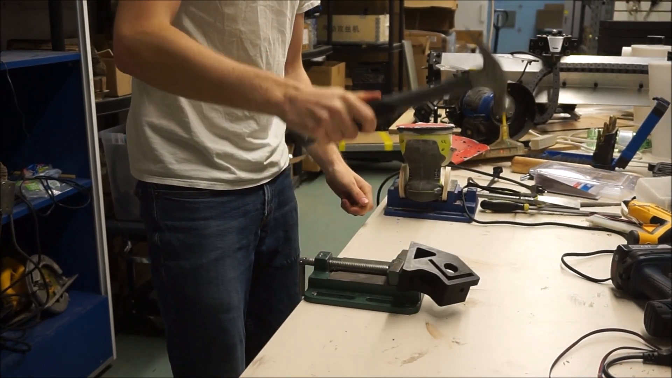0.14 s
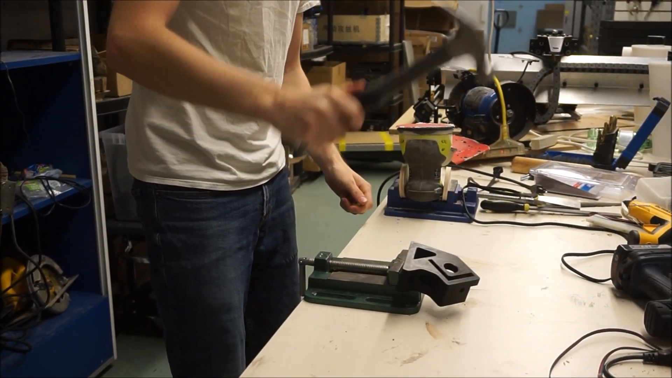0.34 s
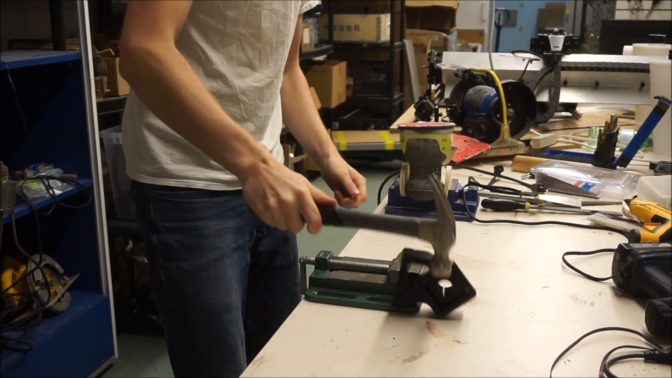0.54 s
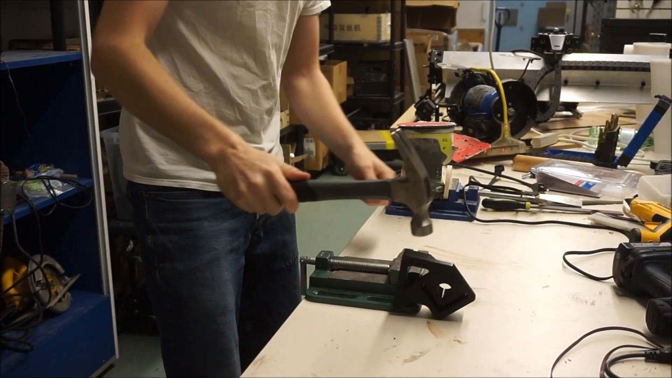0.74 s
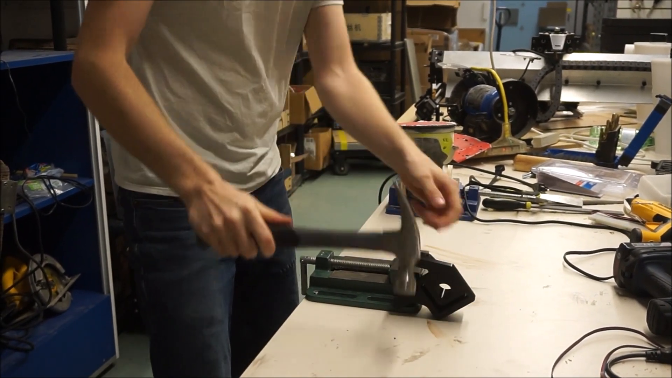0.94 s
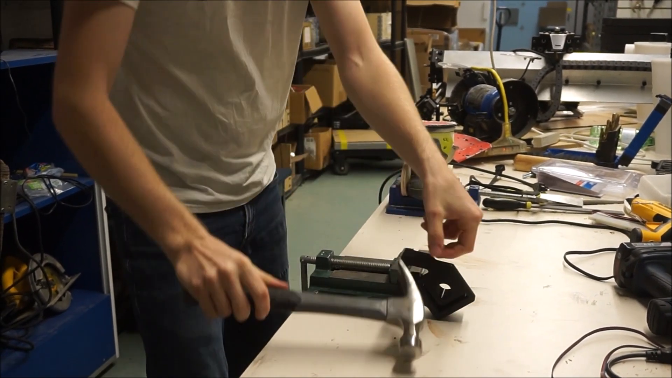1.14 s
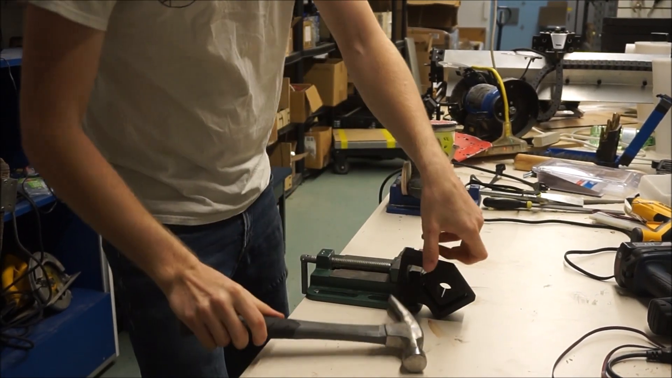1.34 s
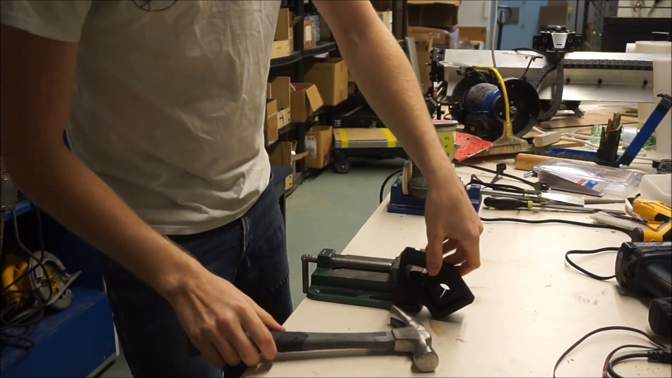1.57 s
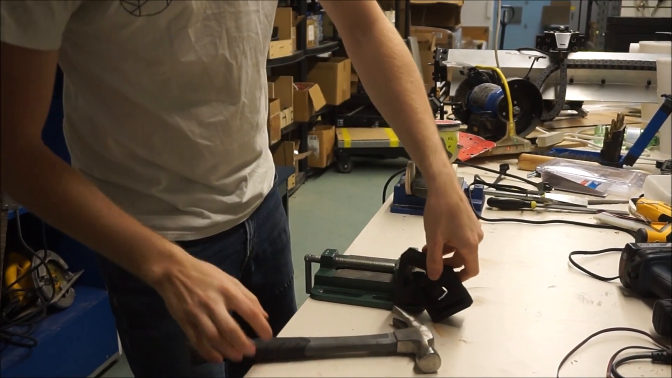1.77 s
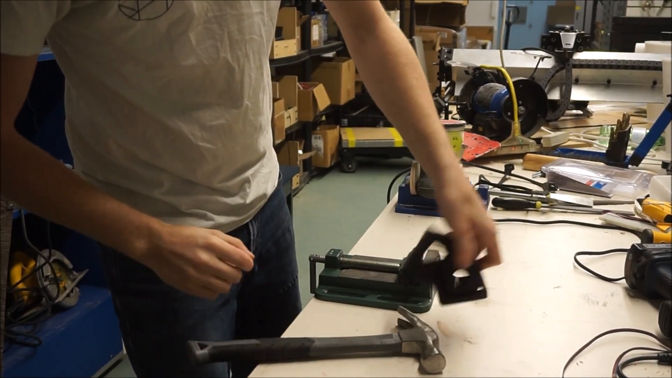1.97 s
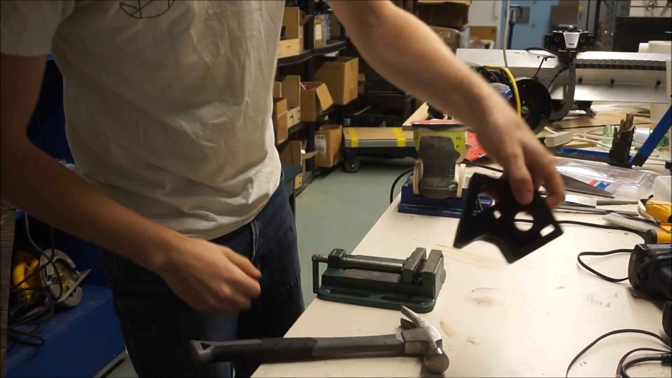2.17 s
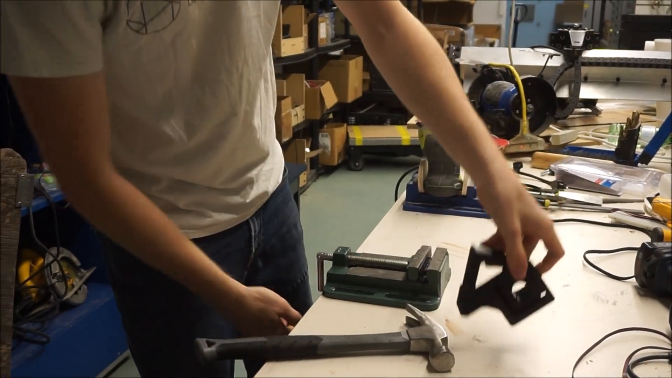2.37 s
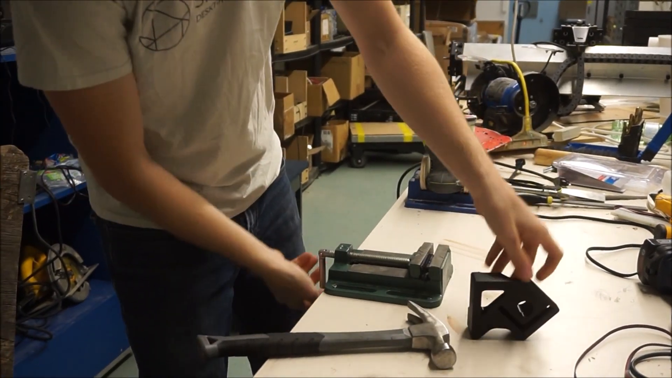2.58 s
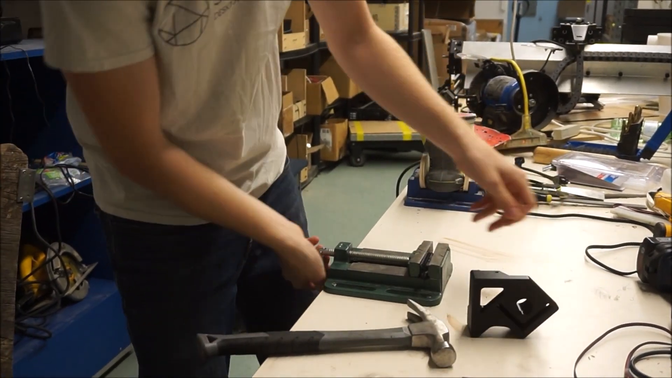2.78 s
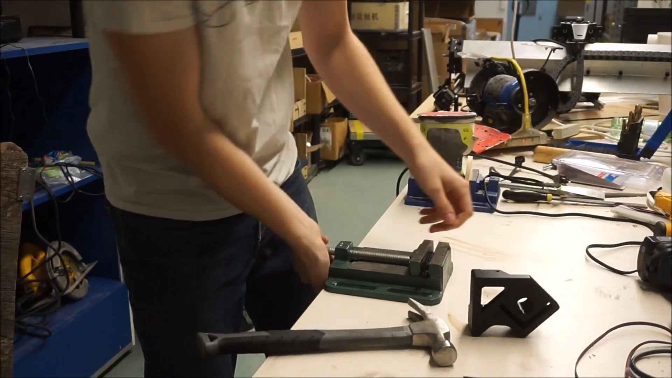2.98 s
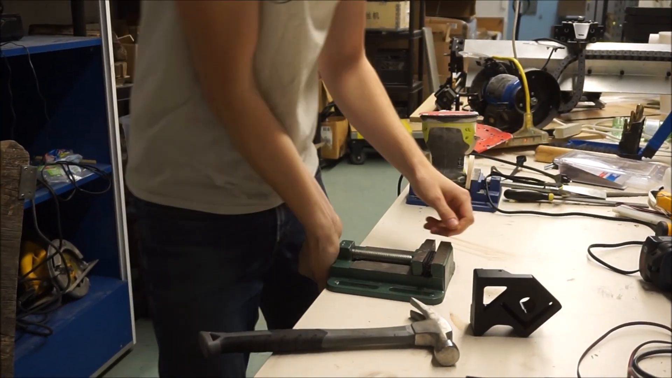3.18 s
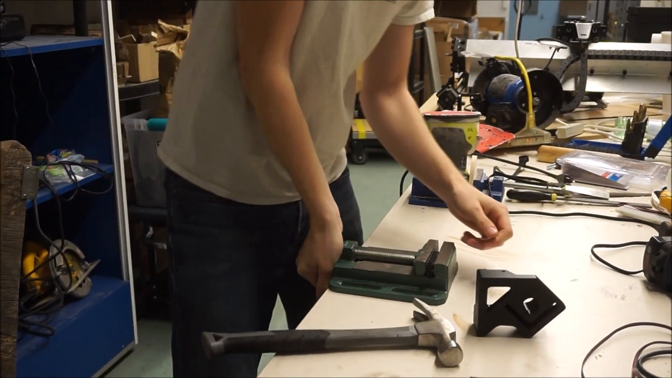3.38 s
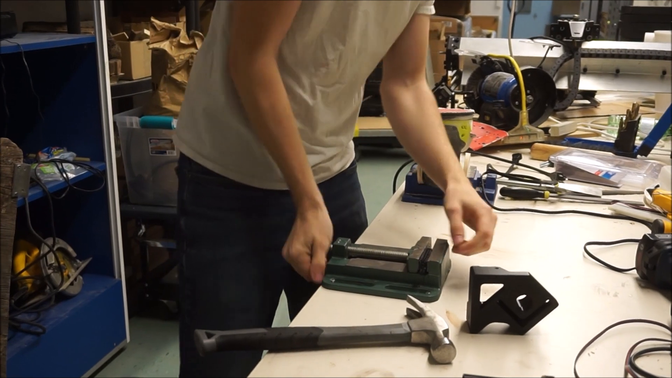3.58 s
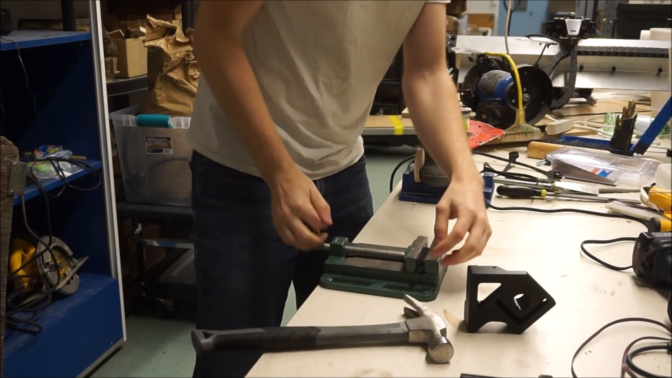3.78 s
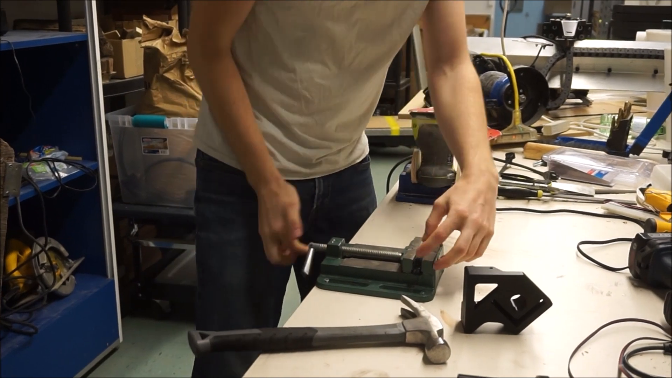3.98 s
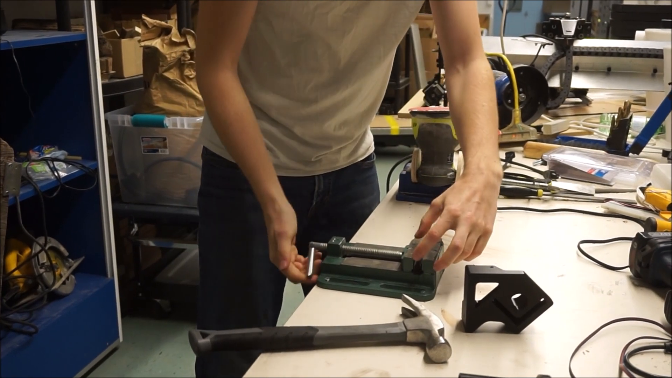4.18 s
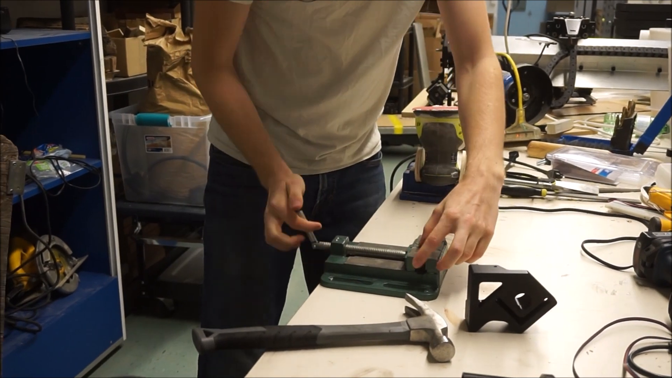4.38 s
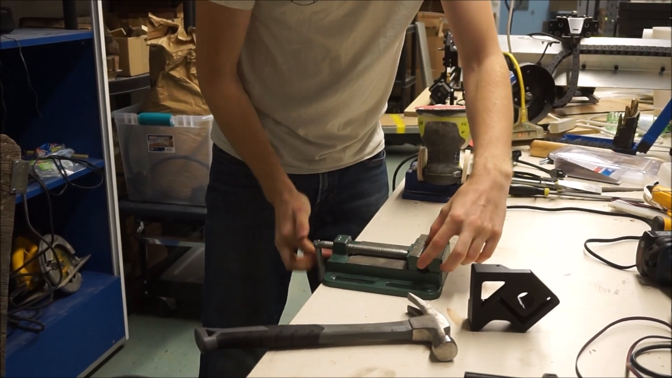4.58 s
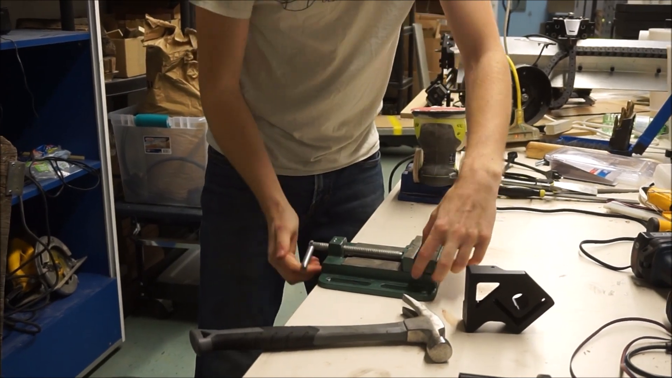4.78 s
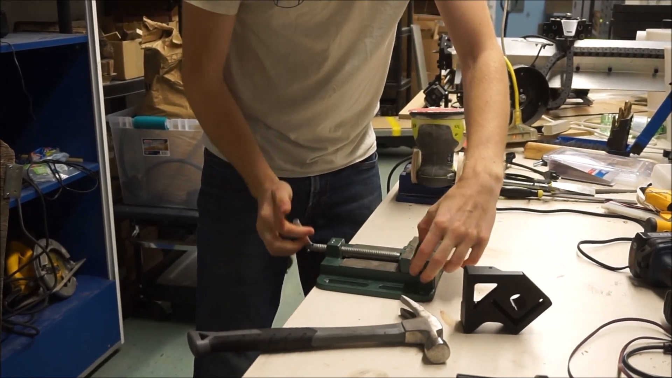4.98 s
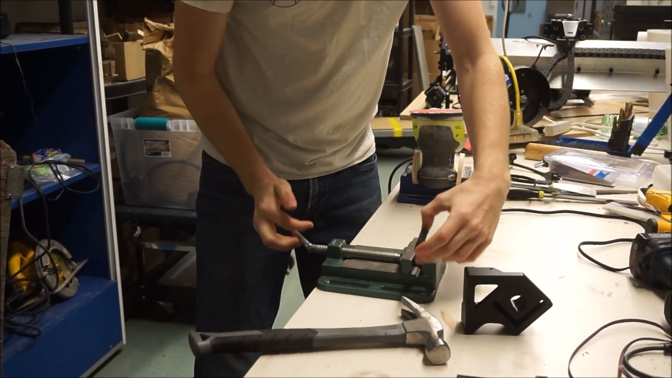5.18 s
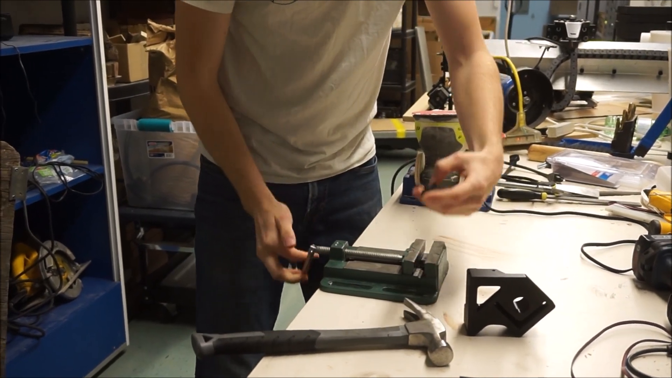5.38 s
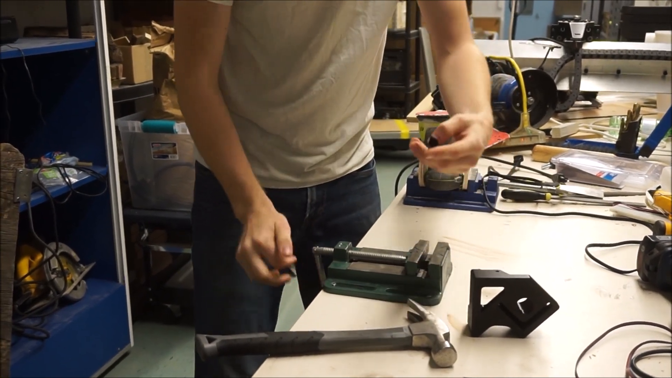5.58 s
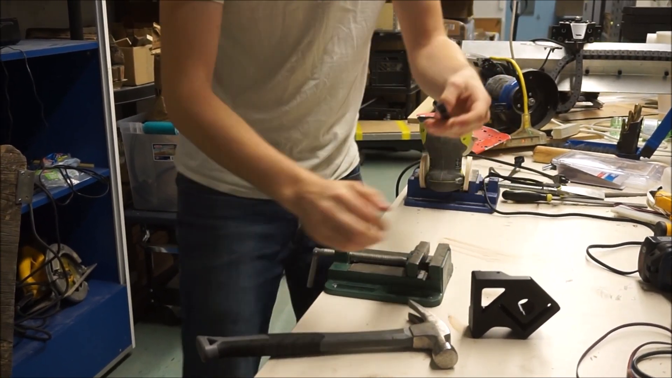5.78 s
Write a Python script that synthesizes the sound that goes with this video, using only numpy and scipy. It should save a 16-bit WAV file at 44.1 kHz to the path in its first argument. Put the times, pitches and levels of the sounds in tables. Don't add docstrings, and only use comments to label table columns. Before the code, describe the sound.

Hammer smacks on plastic ring through a large room, followed by thuds on a wooden bench, metallic vise knocks, handle clinks and a short scrape.

```python
import sys
import numpy as np
from scipy import signal
from scipy.fft import rfft, irfft
from scipy.io import wavfile

SR = 44100
rng = np.random.default_rng(int(sys.argv[2]) if len(sys.argv) > 2 else 0)


def gain_from_decibels(decibels):
    exponent = np.asarray(decibels, float) / 20
    return 10 ** exponent


def wav_record(signal):
    frames = np.transpose(np.atleast_2d(signal))
    bounded = np.clip(frames, -1, 1)
    quanta = np.round(bounded * 32767).astype(np.int16)
    wavfile.write(sys.argv[1], SR, quanta)


N = 257103
LEAD = 4410
LENGTH = N + LEAD

# mode in Hz, level in dB, t60 in seconds.
PLASTIC = [(1020, 5.5, 0.0022), (1170, -14, 0.017), (1862, 11, 0.11), (2690, 2.5, 0.0035),
           (4040, 7.5, 0.059), (4500, 7, 0.027), (5890, 7.5, 0.025)]
# mode in Hz, level in dB, t60 in seconds.
VISE_MODES = [(430, 6, .05), (560, 6, .05), (690, 9, .06), (815, 15, .1), (931, 10, .07), (1092, 13, .08),
              (1170, 13, .08), (1421, 9, .06),
              (1640, 14, .07), (1828, 14, .09), (2010, 9, .07), (2200, 10, .07), (2515, 10, .06),
             (2775, 12, .06), (3055, 12, .08), (3385, 12, .08), (3810, 10, .07), (4150, 7, .02),
             (4560, 9, .07), (5450, 8, .03), (6430, 6, .03), (7450, 9, .05)]
VISE = VISE_MODES


def rms_one(x):
    return x / np.sqrt(np.mean(x ** 2) + 1e-20)


def at_hz(points, hz):
    table_hz, value = np.transpose(points)
    return np.interp(np.log(hz), np.log(table_hz), value)


def band(x, low_hz, high_hz):
    return signal.sosfilt(signal.butter(2, [low_hz, high_hz], "band", fs=SR, output="sos"), x + 1e-18)


def envelope(start_s, peak_db, swell_s, fade_db_per_s):
    since_s = (np.arange(LENGTH) - LEAD) / SR - start_s
    swell = np.clip(1 - since_s / swell_s, 0, 1) ** 3
    fade_db = fade_db_per_s * np.maximum(since_s - swell_s, 0)
    return (since_s > 0) * gain_from_decibels(peak_db - 30 * swell - fade_db)


def ring(x, hz, t60_s):
    radius, angle = gain_from_decibels(-60 / (t60_s * SR)), 2 * np.pi * hz / SR
    return signal.lfilter([0, np.sin(angle)], [1, -2 * radius * np.cos(angle), radius * radius], x + 1e-18)


def struck(points, modes, size):
    hz = np.maximum(np.arange(size + 1) * SR / size / 2, 1)
    peaks = 0
    for centre_hz, db, t60_s in modes:
        detuning = (hz - centre_hz) * t60_s * 2 * np.pi / np.log(1000)
        peaks = peaks + gain_from_decibels(2 * db) / (1 + detuning ** 2)
    cepstrum = irfft(np.log(gain_from_decibels(at_hz(points, hz)) * np.sqrt(1 + peaks)))
    cepstrum[1:size] *= 2
    cepstrum[size + 1:] = 0
    return irfft(np.exp(rfft(cepstrum)))[:size]


def stereo_bands(weight, size):
    # frequency in Hz, likeness -1 to 1.
    likeness = [(30, .4), (70, .65), (130, .995), (300, .985), (600, .8), (2500, .22), (5000, .13),
                (14000, .4)]
    # frequency in Hz, left minus right in dB.
    sidedness = [(60, -3.5), (180, 1.5), (550, -2), (1650, -3.5), (4970, 0), (15000, -0.5)]
    edges_hz = 22 * 2 ** np.arange(0, 9.7, .5)
    out, white = 0, rng.standard_normal((2, 2, size))
    for k, (low_hz, high_hz) in enumerate(zip(edges_hz, edges_hz[1:])):
        mid, side = band(white[k % 2], low_hz, high_hz)
        hz = np.sqrt(low_hz * high_hz)
        alike = np.clip(at_hz(likeness, hz), -1, 1)
        tilt_db = at_hz(sidedness, hz) / 2
        pair = np.sqrt(1 + alike) * mid + np.sqrt(1 - alike) * side * [[1], [-1]]
        out = out + weight(hz) * pair * gain_from_decibels(np.array([[tilt_db], [-tilt_db]]))
    return out


def knocks(events, modes, contact_s, thump_db, bright_db, edge_db, knee_db, middle_db, send_db):
    direct, send, size = np.zeros(LENGTH), np.zeros(LENGTH), 8192
    phase = np.arange(1024) / SR / contact_s
    for s, level_db, dull_db, hard_db in events:
        high_db = middle_db + 0.41 * hard_db
        top_db = hard_db + bright_db
        slope = [(25, dull_db + thump_db), (90, dull_db - 26.0), (200, dull_db - 5.5), (400, dull_db + 5.0),
                 (950, 0.038), (2200, high_db - 8.5), (3400, high_db + knee_db),
                 (5200, top_db + 3.5), (9000, top_db - 0.5), (16000, top_db + edge_db)]
        uneven = rfft(rng.standard_normal(1024) * phase * np.exp(-phase))
        strength = np.abs(uneven)
        rattle = irfft(uneven / (strength + .3 * strength.mean())) * np.exp(-(phase / 7) ** 4)
        excited = []
        for hz, db, t60_s in modes:
            seated_hz = hz * (1 + .012 * rng.normal() * (t60_s < .11))
            excited.append((seated_hz, db + 4.5 * rng.normal(), t60_s))
        sound = struck(slope, excited, size=size)
        close = np.convolve(sound, rattle)[:size]
        sound = gain_from_decibels(level_db) * sound / np.abs(band(sound, 600, 1500)).max()
        close = gain_from_decibels(level_db) * close / np.abs(band(close, 600, 1500)).max()
        at = round(s * SR) + LEAD
        stop = min(size, LENGTH - at)
        direct[at:at + stop] += close[:stop]
        send[at:at + stop] += gain_from_decibels(send_db) * sound[:stop]
    return np.array([direct, send])


def background_air():
    # frequency in Hz, level in dB per Hz.
    air_colour = [(15, -61), (25, -19), (48, -23.5), (70, -12.5), (82, -11.5), (161, -23.5), (190, -13.5),
                  (427, -7), (503, -1), (575, -7), (2550, -18.5), (3160, -22), (3720, -19.5), (16000, -30.5)]
    spectrum = air_colour
    return gain_from_decibels(-64) * rms_one(stereo_bands(lambda hz: gain_from_decibels(at_hz(spectrum, hz)), size=LENGTH))


def room(x, build_s, level_db):
    # frequency in Hz, t60 in seconds.
    room_t60 = [(100, 0.59), (260, 0.64), (700, 0.63), (1840, 0.61), (4850, 0.53), (12800, 0.4)]
    # frequency in Hz, level in dB.
    room_colour = [(100, -3.5), (300, 6.5), (1000, 1), (3000, 4.5), (8000, 5), (15000, 3)]
    t = np.arange(SR) / SR
    tail = stereo_bands(lambda hz: gain_from_decibels(at_hz(room_colour, hz) - 60 * t / at_hz(room_t60, hz)), size=len(t))
    tail = tail * (1 - np.exp(-np.maximum(t - .004, 0) / build_s))
    return gain_from_decibels(level_db) * signal.fftconvolve(x[None], tail, axes=1)[:, :LENGTH]


def placed(x):
    upper = signal.sosfilt(signal.butter(1, 300, "high", fs=SR, output="sos"), x)
    return x + upper * (gain_from_decibels(np.array([[-2.2], [2.2]])) - 1)


def sleeve():
    # start in seconds, peak in dB, swell in seconds, fade in dB per second.
    brush = (3.475, -54.5, .16, 45)
    colour = [(300, -18), (2000, -2.5), (8000, -9.5), (16000, -21.0)]   # (Hz, dB)
    return envelope(*brush) * rms_one(stereo_bands(lambda hz: gain_from_decibels(at_hz(colour, hz)), size=LENGTH))


def vise_scrapes(slips_per_s, send_db):
    # start in seconds, peak in dB, swell in seconds, fade in dB per second.
    strokes = [
        (3.675, -47, .09, 403),
        (5.05, -28, 0.034, 54.5),
    ]
    slips = (rng.random(LENGTH) < slips_per_s / SR) * gain_from_decibels(2.7 * rng.exponential(1, LENGTH))
    slips = slips * rng.choice([-1, 1], LENGTH)
    slope = [(100, -37.0), (400, -1), (900, 5.0), (3000, -17), (9000, -35.0), (16000, -36)]
    scraped = rms_one(signal.fftconvolve(slips, struck(slope, VISE, size=8192))[:LENGTH])
    out = scraped * sum(envelope(*stroke) for stroke in strokes) * gain_from_decibels(-8)
    return np.array([out, gain_from_decibels(send_db) * out])


def handle_tinkles(send_db):
    # start in seconds, level in dB, pitch favoured by the spot struck in Hz.
    strikes = [(3.8394, -34, 4800), (4.0048, -12.5, 6000), (4.132, -22, 4800), (4.1977, -30.5, 11300),
               (4.3201, -16, 6020), (4.344, -44.5, 8600), (4.346, -30, 13800), (4.6208, -19, 11450),
               (4.752, -34.5, 4770), (4.7527, -31, 11840), (5.0877, -33.5, 6300), (5.231, -22.5, 6170),
               (5.232, -32, 12800), (5.6395, -34, 5470), (5.639, -36.5, 11040)]
    # mode in Hz, level in dB, t60 in seconds.
    bar = [(4810, 3.6, 0.015), (8630, 13.4, 0.038), (10230, 0.013, 0.025), (11820, 0.005, 0.0089),
           (13400, 3, 0.027)]
    s, level_db, spot_hz = np.transpose(strikes)
    out, at = 0, np.round(s * SR).astype(int) + LEAD
    for hz, db, t60_s in bar:
        spot_loss_db = 56 * np.abs(np.log2(hz / spot_hz))
        clicks = np.zeros(LENGTH)
        clicks[at] = gain_from_decibels(level_db - spot_loss_db + db - 9)
        out = out + ring(clicks, hz * .992, t60_s) + ring(clicks, hz * 1.01, t60_s * .7)
    return np.array([out, gain_from_decibels(send_db) * out])


def vise_knocks():
    # start in seconds, level in dB, dull weight in
    # dB, bright hardness in dB.
    joints = [(3.835, -12, -21, -19), (3.839, -7, -14.5, -24), (3.954, -13.5, 0, -22),
              (3.999, -11, -11, -6), (4.127, -16, -7, -8), (4.281, -22, -7, -31),
              (4.319, -14.5, -19, -20.5), (4.456, -23.5, -13.5, -58), (4.563, -16, -10.5, -25),
              (4.624, -12, -14, -14.5), (4.799, -36, -1, -16), (4.999, -31.5, -10, -23),
              (3.831, -10.5, -19, -35), (4.554, -28, -10, -38), (4.742, -52, 1, 25)]
    # [s, dB, dB, dB].
    clacks = [(3.887, -20.5, -37, -25), (3.995, -28, -11, 0), (4.342, -22, -46, -47.5),
              (4.674, -28, -10, -14), (4.748, -39, 8.5, -11), (5.081, -38, -6, 14.5), (5.093, -36.5, 7, 20)]
    # [s, dB, dB, dB].
    bumps = [(4.373, -23.5, -11, -40), (4.657, -22.5, -10, -39), (4.939, -36, -4, -42),
             (5.227, -24.5, -8, -19.5), (5.45, -40.5, -1, -29), (5.52, -37.5, -0.5, -37),
             (5.626, -29.5, -10, -28), (5.647, -29.5, -19, -28.5)]
    return (knocks(joints, VISE, contact_s=0.0029, thump_db=-32, bright_db=-15,
                   edge_db=-14, knee_db=-15, middle_db=1.4, send_db=2.5)
            + knocks(clacks, VISE, contact_s=0.002, thump_db=-24, bright_db=-26,
                     edge_db=-7, knee_db=-19, middle_db=16, send_db=7.0)
            + knocks(bumps, VISE, contact_s=0.0011, thump_db=-11, bright_db=-6,
                     edge_db=0, knee_db=-15.5, middle_db=-7.5, send_db=2.5))


def tools_laid_down():
    # start in seconds, level in dB, dull weight in dB, bright hardness in dB.
    hammer_down = [
        (1.315, -12, -4, -28),
        (1.356, -23.5, -12, -36),
        (1.378, -9.5, -8, -34.5),
        (1.411, -16.5, -23, -38),
        (1.442, -20.5, -0.5, -32),
        (1.832, -8.5, -1.5, -29),
        (1.84, -18, -2.5, -54),
        (1.848, -8.5, -12, -35),
        (1.869, -24.5, 6, -38.5),
        (1.909, -23, -6.5, -18),
    ]
    # start in seconds, level in dB, dull weight in dB, bright hardness in dB.
    part_down = [
        (2.57, -10.5, -9.5, -24.5),
        (2.595, -16, -13.5, -20),
        (2.614, -11.5, -12.5, -41.5),
        (2.646, -10, -19.5, -31.5),
        (2.684, -19.5, -8.5, -39),
        (2.701, -18, -18.5, -29.5),
        (2.789, -25, -16, -22),
        (2.821, -32.5, -19, -16.5),
    ]
    # mode in Hz, level in dB, t60 in seconds.
    bench = [(285, 5.1, 0.075), (348, 9.5, 0.087), (443, 4.8, 0.14), (604, 11, 0.011), (620, 8, 0.051),
             (800, 13, 0.098), (950, 2, 0.035), (1247, 3.6, 0.022)]
    # mode in Hz, level in dB, t60 in seconds.
    hammer = [(4016, 13, .3), (4550, 16, .35), (5340, 23, .3), (6270, 14, .08), (6708, 13, .12),
              (8190, 14, .15), (9141, 8, .08), (10200, 11, .08)]
    # mode in Hz, level in dB, t60 in seconds.
    part = [(663, 7.2, 0.2), (790, 10.8, 0.023), (955, 4.7, 0.018), (1280, 5.9, 0.033), (2360, 12.2, 0.012),
            (3060, 3.8, 0.055), (3730, 6.7, 0.14), (5600, 13, 0.014), (6660, 12, .03), (7680, 14, 0.021),
            (9140, 6, 0.027), (10300, 8.5, 0.014), (11500, 7, 0.024)]
    return (knocks(hammer_down, bench + hammer, contact_s=0.0018, thump_db=-38.0, bright_db=-8.5,
                   edge_db=-25.5, knee_db=-21.5, middle_db=8.0, send_db=3.0)
            + knocks(part_down, bench[:4] + part, contact_s=0.002, thump_db=-11, bright_db=-15.0,
                     edge_db=-17.0, knee_db=-11, middle_db=1.5, send_db=4.5))


def part_breaking():
    # start in seconds, level in dB, dull weight in dB, bright hardness in dB.
    chip = [
        (.6655, -12, -22, -14),
    ]
    # [s, dB, dB, dB].
    release = [
        (1.4805, -2, -12.5, -26),
    ]
    # [s, dB, dB, dB].
    snaps = [
        (1.292, -53, -12.5, 10),
        (2.020, -21, 2.5, -19.5),
        (2.097, -59, -21, 13),
        (2.108, -55, -3, 22.5),
        (2.118, -59, 5.5, 21.5),
    ]
    # mode in Hz, level in dB, t60 in seconds.
    bracket = [(592, 6, .03), (867, 6, .03), (1270, 8, .02), (1600, 7, .012), (2050, 5, .01),
               (2600, 4, .01), (5790, 4, .05), (6710, 6, .03), (7700, 9, .006)]
    return (knocks(chip, PLASTIC, contact_s=0.00074, thump_db=-16, bright_db=-16.0,
                   edge_db=-26.5, knee_db=-18, middle_db=7.0, send_db=11.0)
            + knocks(release, bracket, contact_s=0.00064, thump_db=-37.5, bright_db=-15.5,
                     edge_db=-37.0, knee_db=-20.5, middle_db=2.0, send_db=10.0)
            + knocks(snaps, PLASTIC, contact_s=0.00025, thump_db=-9.0, bright_db=-7.5,
                     edge_db=-21, knee_db=-7.0, middle_db=9, send_db=-3.5))


def hammer_blows():
    # start in seconds, level in dB, dull weight in dB, bright hardness in dB.
    blows = [
        (-.07, -6.5, -8.5, 13),
        (.5473, -11, -13, -1),
    ]
    # [s, dB, dB, dB].
    rebound = [
        (.5510, -6.5, -8.5, -15),
    ]
    return (knocks(blows, PLASTIC, contact_s=0.0015, thump_db=-11, bright_db=-18.0,
                   edge_db=-8, knee_db=-9, middle_db=2.5, send_db=18.5)
            + knocks(rebound, PLASTIC, contact_s=0.0004, thump_db=-19.5, bright_db=-11.5,
                     edge_db=-22.0, knee_db=-14.5, middle_db=5.5, send_db=19))


def scene():
    direct, send = (hammer_blows() + part_breaking() + tools_laid_down() + vise_knocks()
                    + handle_tinkles(send_db=-0.5) + vise_scrapes(slips_per_s=1100, send_db=-1.5))
    background = background_air()
    cloth = sleeve()
    tail = room(send, build_s=0.0067, level_db=-33)
    return (placed(direct) + tail + background + cloth)[:, LEAD:]


def top_cut(x):
    return signal.sosfilt(signal.butter(12, 16460, fs=SR, output="sos"), x)


def record(dry):
    # start in seconds, depth in dB.
    ducks = [
        (-.065, 40),
        (0.551, 31),
        (1.484, 16),
        (3.849, 0.5),
    ]
    attack_s, recover_s, recover_shape = 0.0061, .14, 1.14
    t, gain_db = np.arange(N) / SR, 0
    for s, depth_db in ducks:
        since_s = np.maximum(t - s, 0)
        drop = 1 - np.exp(-since_s / attack_s)
        gain_db = gain_db - depth_db * drop * np.exp(-(since_s / recover_s) ** recover_shape)
    dip_hz = 9900
    heard = dry - .45 * band(dry, dip_hz * .93, dip_hz * 1.07)
    limited = .85 * np.tanh(heard * gain_from_decibels(gain_db) / .85)
    mix = signal.sosfilt(signal.cheby2(18, 60, 16050, fs=SR, output="sos"), limited)
    return top_cut(mix)


dry = scene()
out = record(dry)
wav_record(out)
```